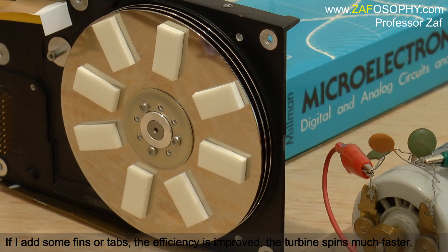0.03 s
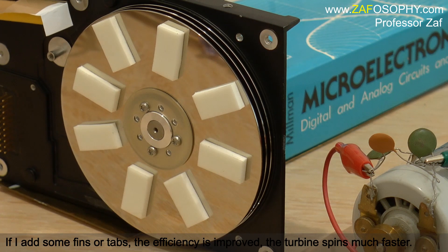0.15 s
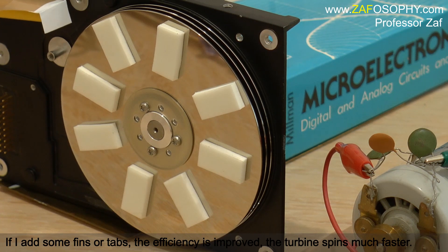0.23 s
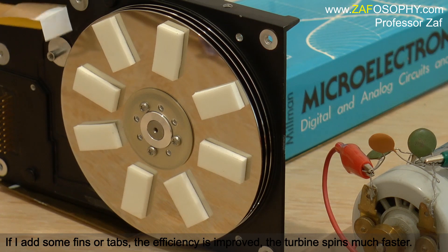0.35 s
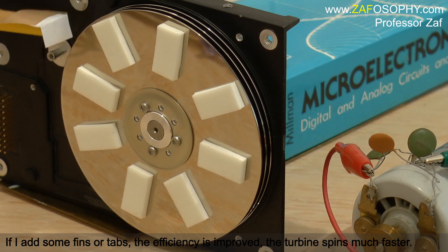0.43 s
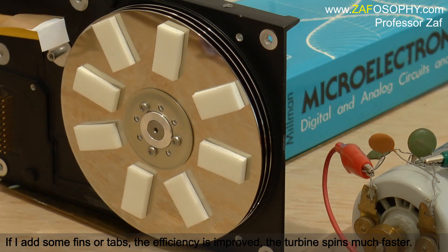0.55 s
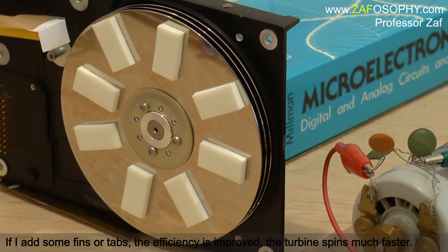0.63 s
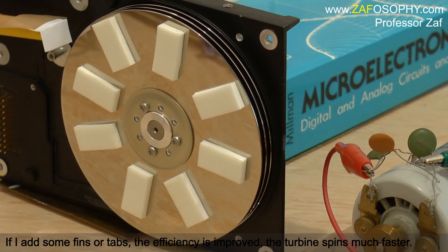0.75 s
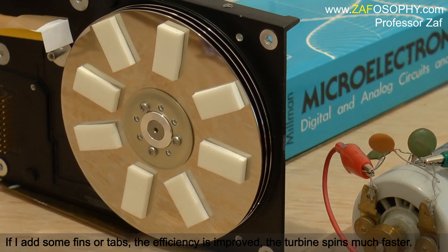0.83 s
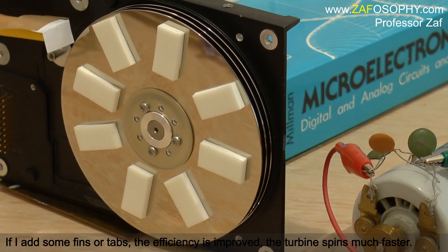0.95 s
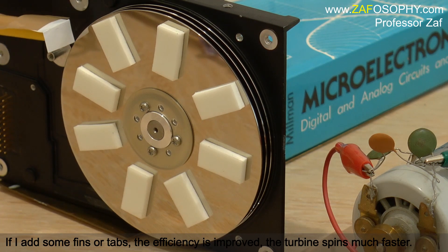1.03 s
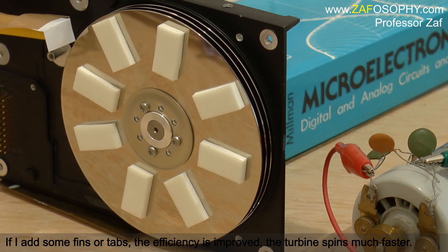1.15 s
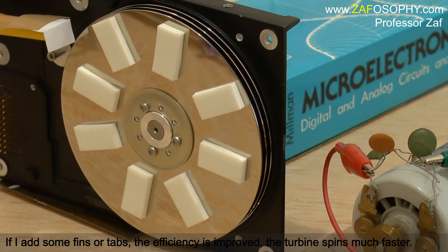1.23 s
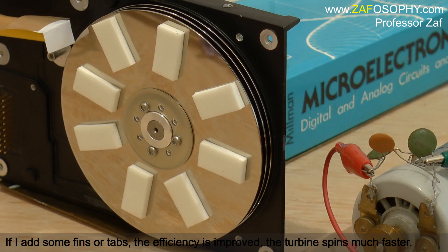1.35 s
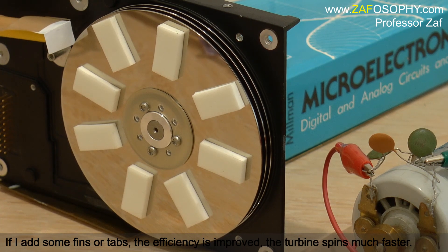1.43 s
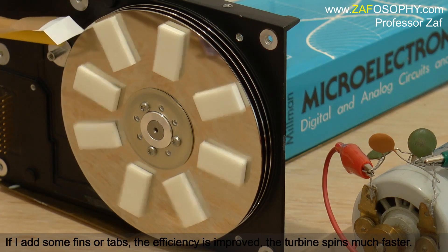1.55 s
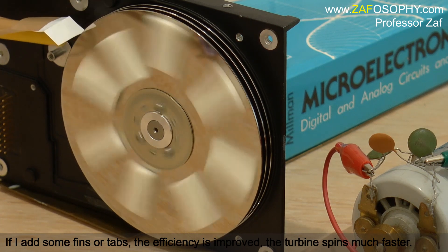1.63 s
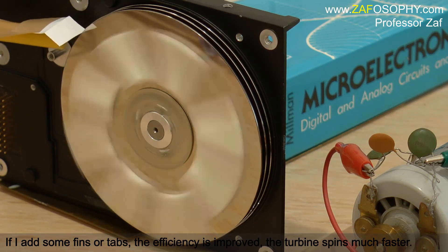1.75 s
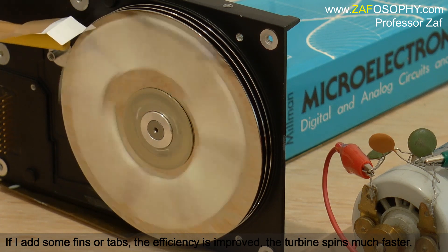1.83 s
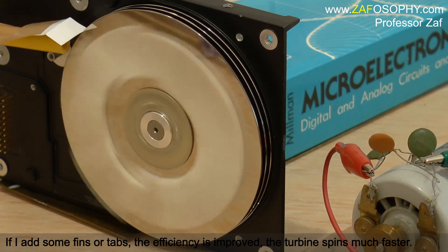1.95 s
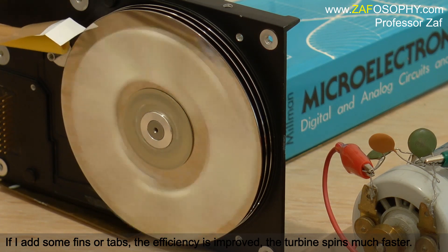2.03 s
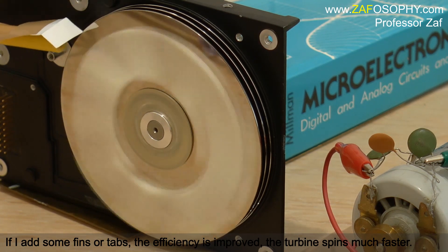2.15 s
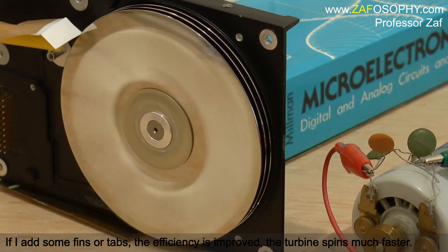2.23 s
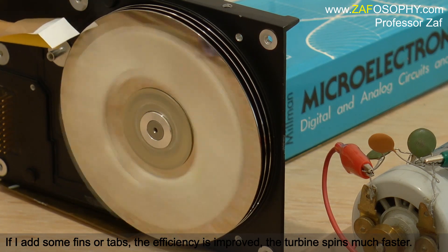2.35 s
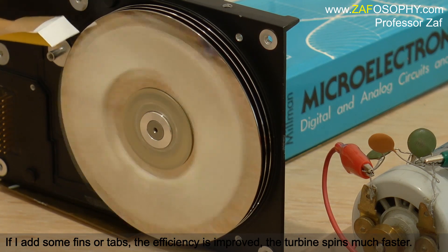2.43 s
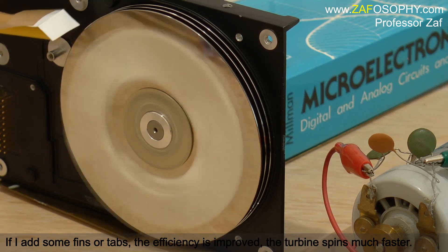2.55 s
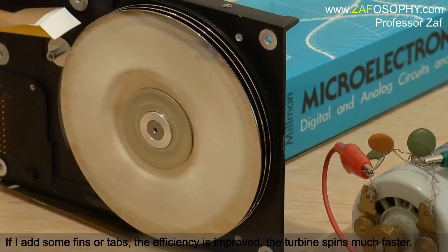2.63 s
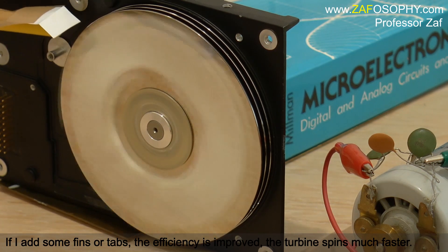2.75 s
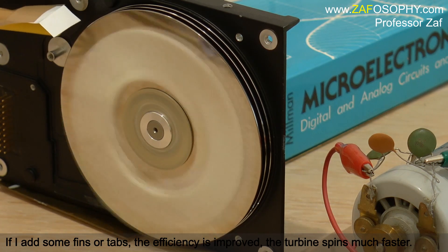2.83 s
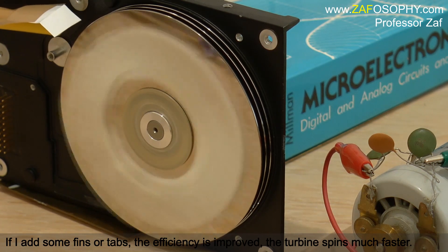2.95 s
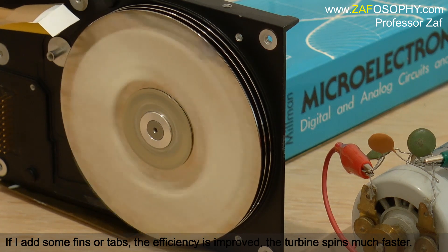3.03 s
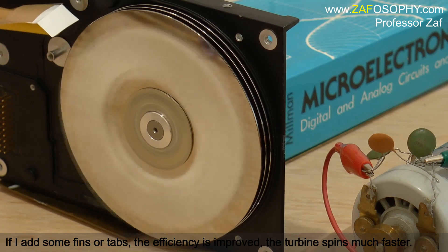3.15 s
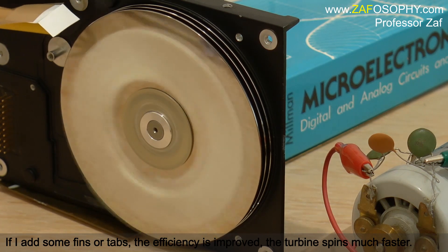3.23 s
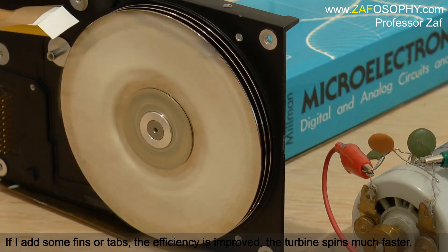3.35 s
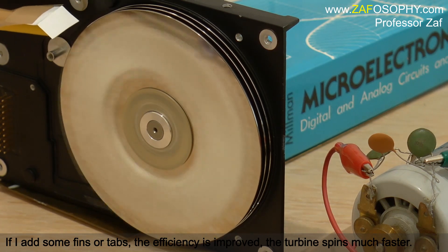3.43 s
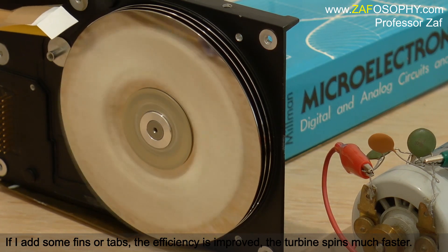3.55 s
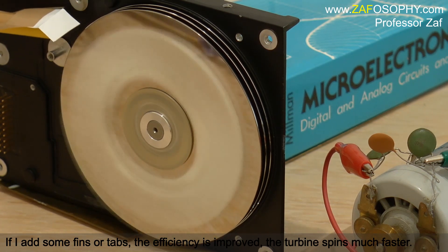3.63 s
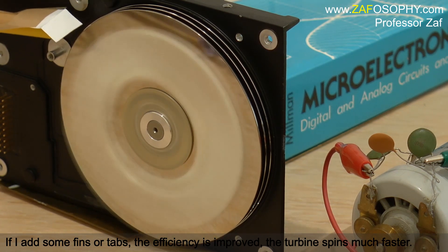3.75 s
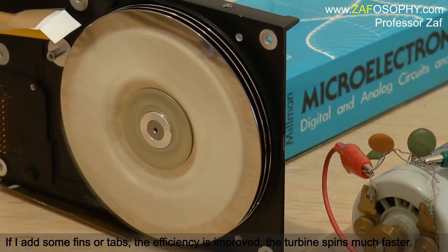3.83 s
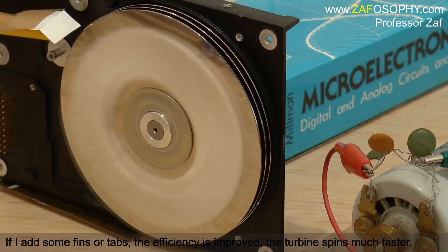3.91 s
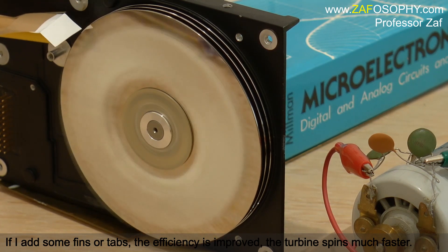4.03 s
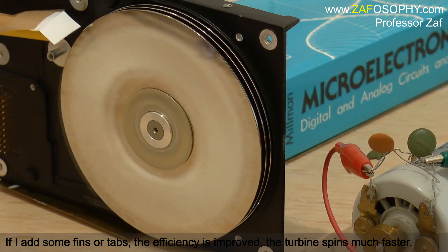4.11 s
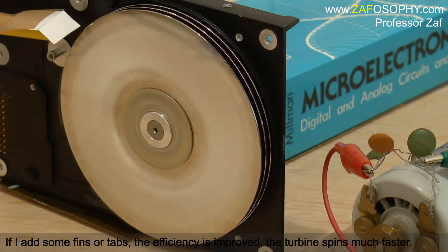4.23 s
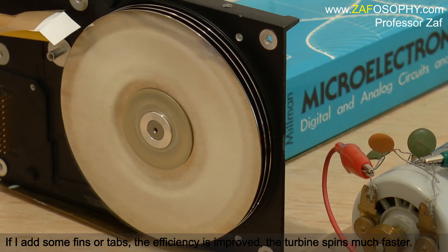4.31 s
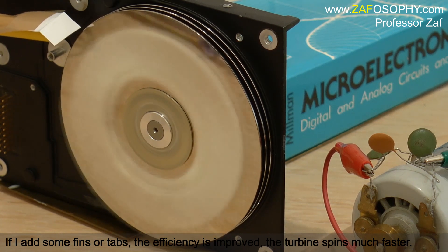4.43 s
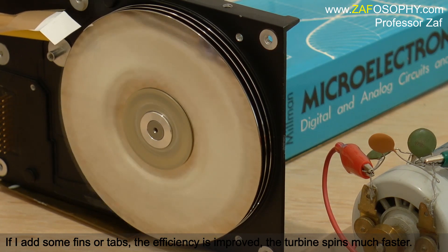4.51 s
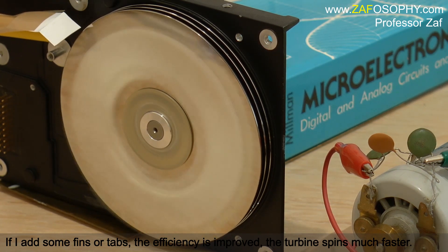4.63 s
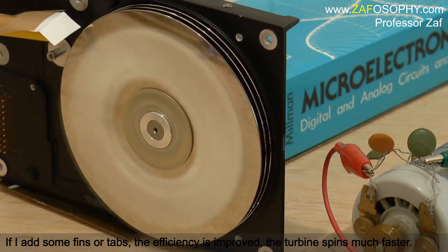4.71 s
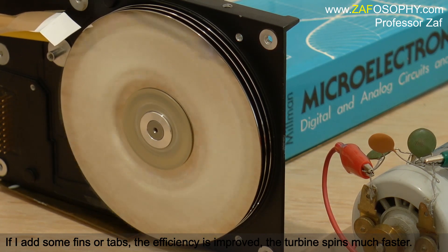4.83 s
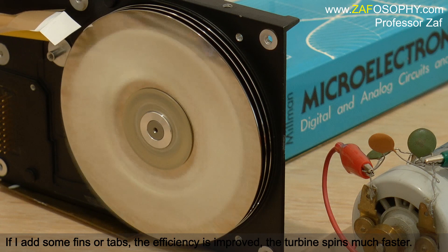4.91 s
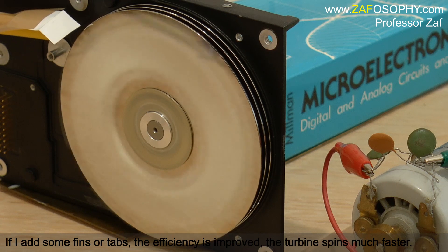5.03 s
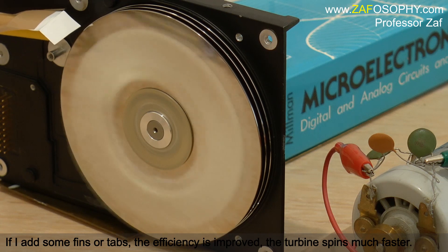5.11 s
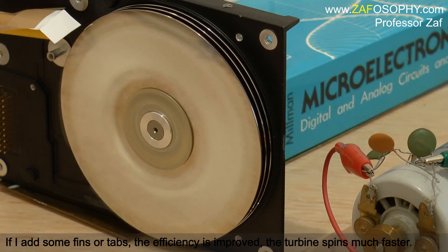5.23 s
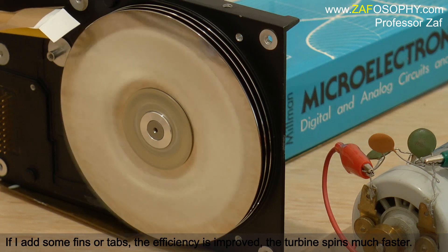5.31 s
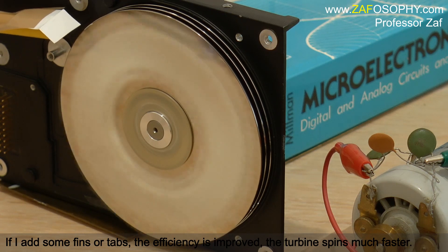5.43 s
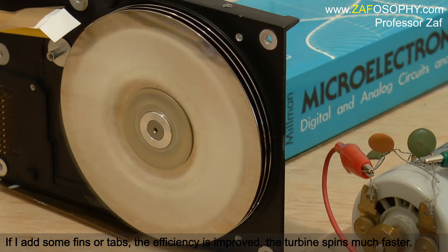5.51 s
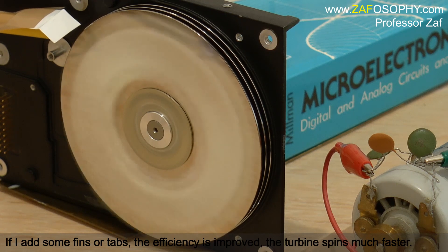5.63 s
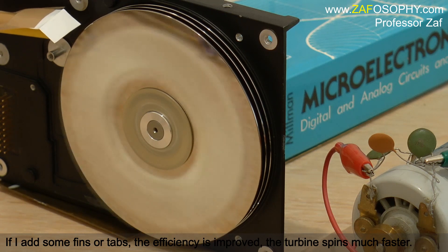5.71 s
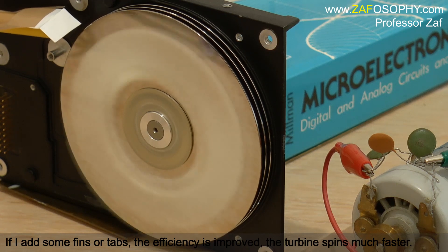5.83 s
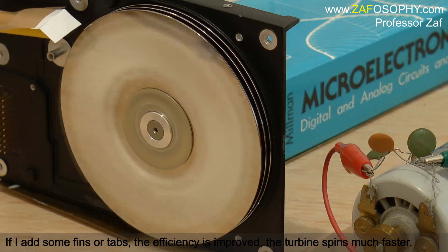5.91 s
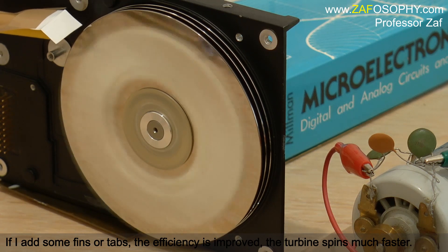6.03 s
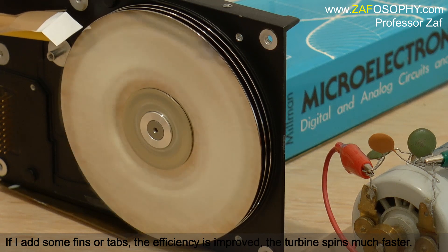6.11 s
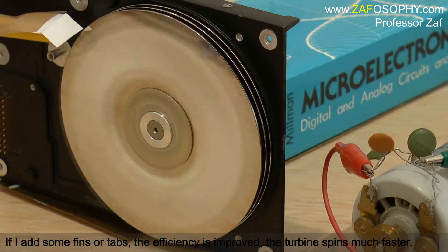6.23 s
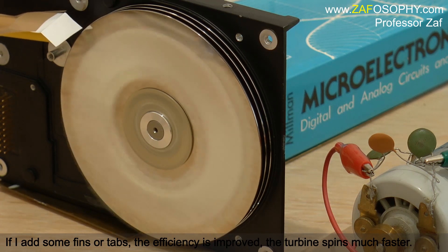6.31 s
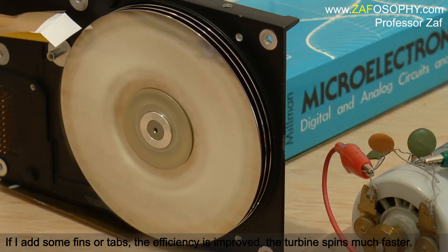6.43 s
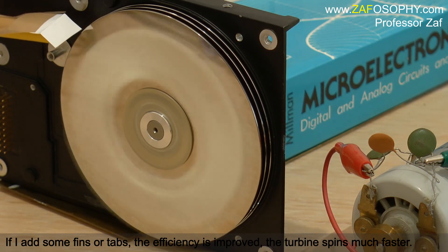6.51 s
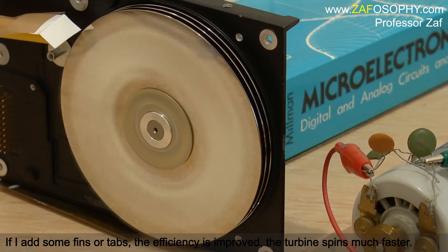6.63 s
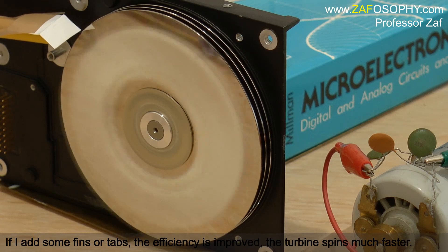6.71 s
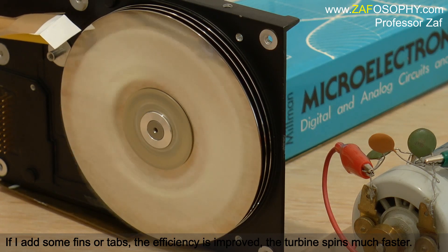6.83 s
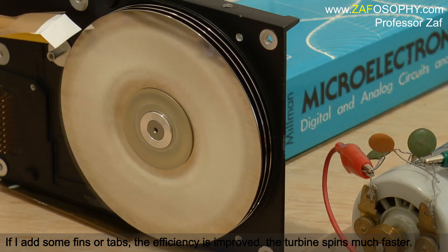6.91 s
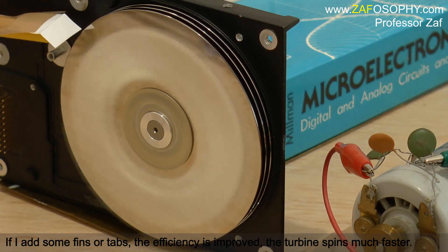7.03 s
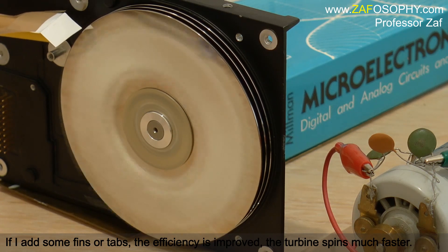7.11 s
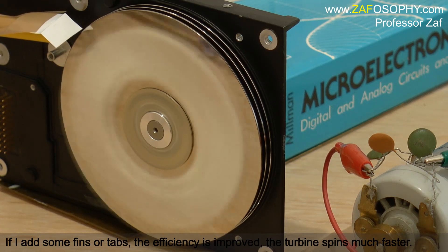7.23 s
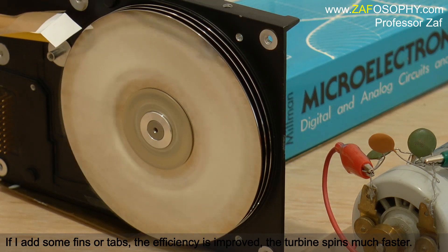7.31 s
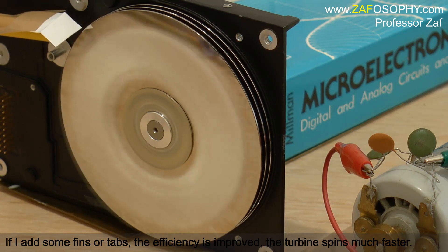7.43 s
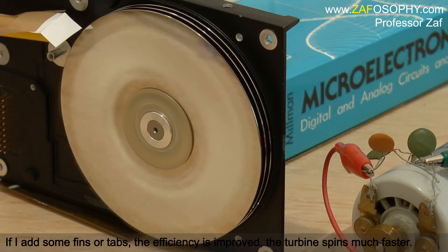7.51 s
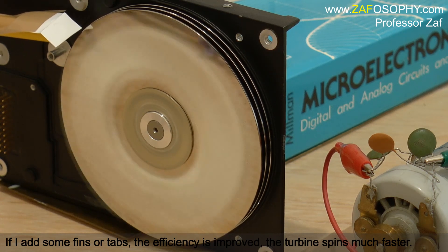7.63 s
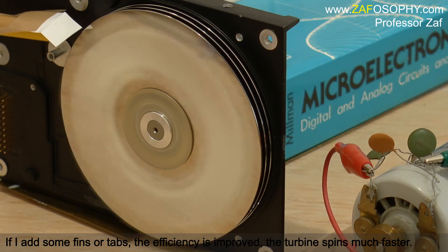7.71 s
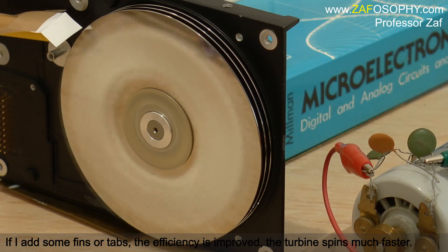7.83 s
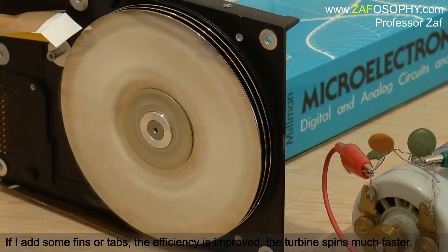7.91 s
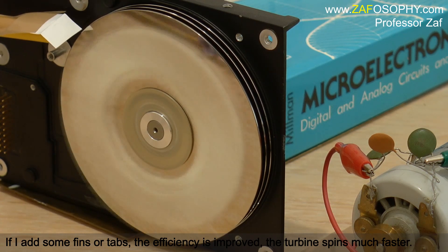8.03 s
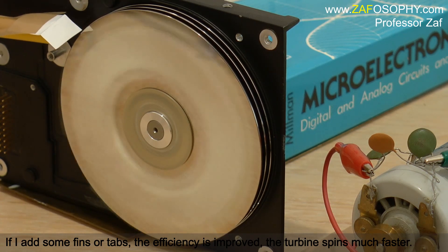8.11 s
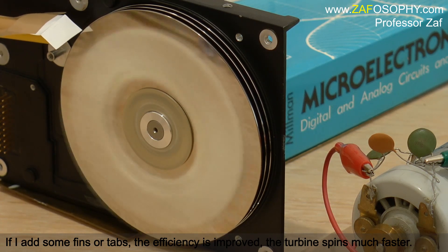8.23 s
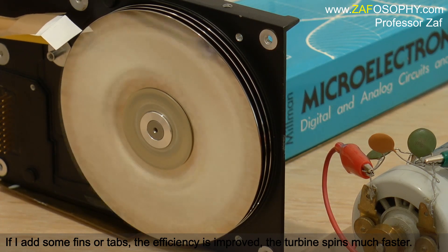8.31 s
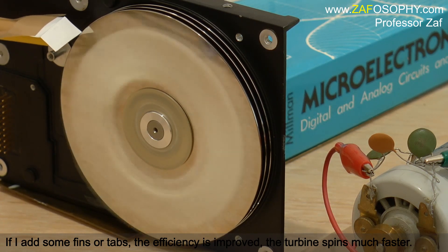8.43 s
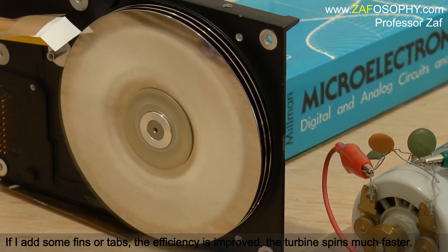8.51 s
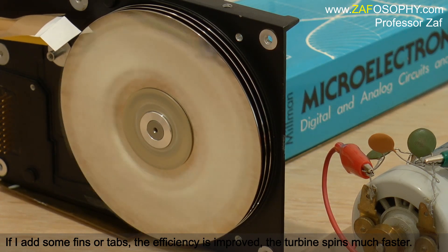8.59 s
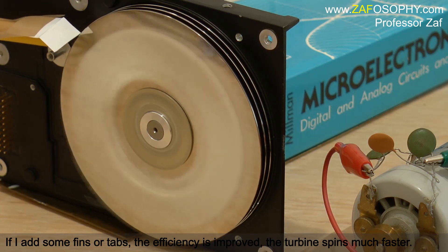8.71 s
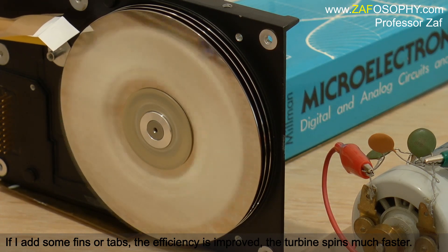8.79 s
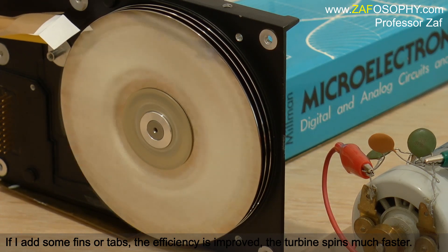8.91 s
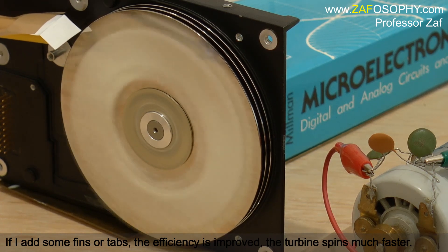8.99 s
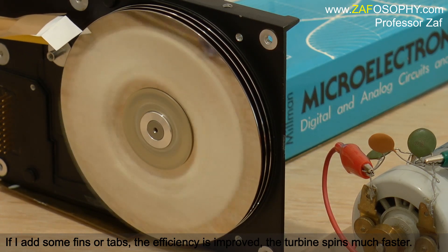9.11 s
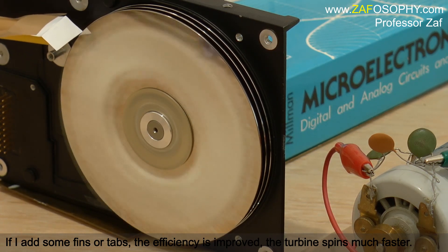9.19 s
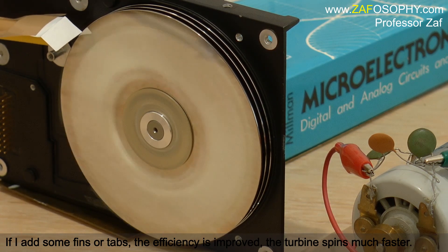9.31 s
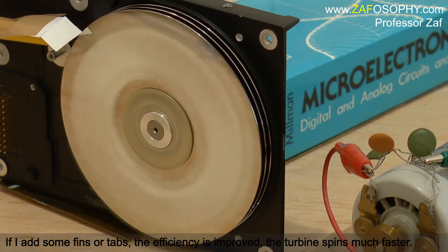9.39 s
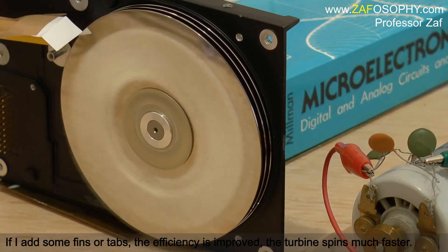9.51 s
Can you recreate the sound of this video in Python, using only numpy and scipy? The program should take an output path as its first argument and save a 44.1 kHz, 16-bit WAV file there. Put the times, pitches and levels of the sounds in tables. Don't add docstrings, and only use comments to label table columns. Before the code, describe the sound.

A close stereo microphone hears a quiet desk scene: soft electrical hum, tiny motor whirr and two light skin scuffs on a nozzle. Suddenly a valve opens and compressed air hisses loudly without a break. The jet drives a finned disc; its hum glides upward beneath the hiss, swelling at case resonances, then drops slightly. Stray air rushes, flutters and thumps softly against the microphone as the aim shifts.

```python
import sys
import numpy as np
from scipy import signal
from scipy.fft import rfft, irfft
from scipy.io import wavfile
from scipy.ndimage import uniform_filter1d

SR = 44100
rng = np.random.default_rng(int(sys.argv[2]) if len(sys.argv) > 2 else 0)


def volts_from_db(level):
    exponent = np.asarray(level, float) / 20
    return 10 ** exponent


def unload_audio(sound):
    columns = np.transpose(np.atleast_2d(sound))
    steps = np.round(np.clip(columns, -1, 1) * 32767)
    wavfile.write(sys.argv[1], SR, steps.astype(np.int16))


N = 421596
T = np.arange(N) / SR
HZ = np.fft.rfftfreq(N, 1 / SR)
VALVE_S = 1.613
SINCE = np.maximum(T - VALVE_S, 0)
STEP = 8

# (frequency [Hz], level per Hz [dB])
JET_COLOUR = [(1400, -19.5), (1700, -14.5), (2100, -15.5), (2500, -9), (3000, -7), (3860, -3.5),
              (6000, -3.5), (7130, 0), (9420, -5.5), (10300, -4), (11800, -9.5), (13300, -13), (15700, -15),
              (16000, -15)]
# (frequency [Hz], side minus middle [dB])
JET_WIDTH = [(1000, -40), (2000, -16), (2600, -47), (7400, -56), (7900, -16.5), (10500, -8.5),
             (12200, -17.5), (13800, -4.5), (16000, -6)]
# (time [s], level [dB])
AIM = [(3.0, -0.5), (3.8, 1), (4.6, 1.5), (5.0, -1), (5.5, 0), (6.2, -3), (6.6, 3), (7.1, 3.5), (7.8, -0.5),
       (8.55, 3.5), (8.95, 4), (9.3, -1), (9.56, 2)]
# (time [s], level over the hiss [dB], half length [s])
RASPS = [
    (2.78, -9, .03),
    (3.83, -8.5, 0.027),
    (4.24, -15, .03),
    (5.76, -13, .025),
]
HISS_DB, LOW_DB, BRIGHT_DB, TOP_DB = -26.5, -12.5, -0.93, -5
LOW_PER_AIM = 0.36
BRIGHT_SAG_DB_PER_S, TOP_SAG_DB_PER_S2 = 0.29, 0.11
BRIGHT_SURGE_DB, BRIGHT_SURGE_S = 2.5, 0.1


def jet(turn):
    chop_db = 0.2 * np.cos(2 * np.pi * 8 * turn)
    eddies = rng.standard_normal(N) * volts_from_db(walk(900) + chop_db)
    lag = np.arange(SR // 5) / SR
    echoes = volts_from_db(-37) * rng.standard_normal(len(lag)) * np.exp(-lag / 0.035)
    echoes[0] = 1
    both = wide(JET_COLOUR, JET_WIDTH, unit(signal.fftconvolve(eddies, echoes)[:N]))

    low = np.hypot(volts_from_db(LOW_DB + LOW_PER_AIM * curve(AIM)), bumps(RASPS))
    surge_db = BRIGHT_SURGE_DB * np.exp(-SINCE / BRIGHT_SURGE_S)
    bright = volts_from_db(BRIGHT_DB - BRIGHT_SAG_DB_PER_S * SINCE + surge_db)
    top = volts_from_db(TOP_DB - TOP_SAG_DB_PER_S2 * SINCE ** 2)
    edges = [1, ramp(2830, 3630), ramp(8000, 8420), ramp(10500, 11900), 0]
    hiss = 0
    for k, gain in enumerate([low, 1, bright, top]):
        band = unit(irfft(both * (edges[k] - edges[k + 1]), N))
        hiss = hiss + band * gain * volts_from_db(HISS_DB + 0.22 * walk(14))

    from_opening = np.abs(T - VALVE_S)
    squeal = volts_from_db(-28) * narrow_noise(10200, 500) * np.exp(-from_opening / 0.03)
    spit = volts_from_db(-50) * narrow_noise(1400, 500) * np.exp(-from_opening / 0.014)
    return hiss + squeal + spit


def valve(rise_s=0.0027, surge_db=2.5, surge_s=0.026):
    opening = np.exp(np.minimum(T - VALVE_S, 0) / rise_s)
    return opening * volts_from_db(surge_db * np.exp(-SINCE / surge_s))


# (multiple of the turn rate, level [dB])
FINS = [(7, -9), (8, 7), (9, 1), (12, 8), (13, 9), (14, 8), (15, 4), (16, 11), (17, 13), (18, 3), (19, -4),
        (20, 13), (21, 14), (22, 7), (23, 9), (24, 2), (25, 4), (26, 1), (27, -6), (28, 3), (29, 8),
        (30, 5), (31, 4), (33, -5), (34, -4), (35, -6), (36, 2), (37, -3), (38, -1), (39, -4), (40, -6),
        (41, -7), (43, -8), (44, -1), (45, -4), (46, -2)]
# (multiple of the turn rate, level [dB])
WOBBLE = [(6, -11.5), (10, -11), (11, -11), (32, -2)]
# (frequency [Hz], width [Hz], level [dB])
CASE = [(138, 12, 13), (192, 10, 11), (219, 16, 1), (249, 9, 7), (269, 9, 2), (305, 18, 5), (351, 18, -5),
        (390, 12, -7), (415, 26, -4), (447, 12, -1), (440, 9, 2), (459, 11, -4), (484, 9, -12),
        (529, 28, -6), (582, 11, -2), (616, 11, -12), (711, 59, -10), (777, 28, -4), (823, 14, -2),
        (871, 60, -15), (997, 15, -2), (1067, 45, -6), (1137, 9, -6), (1226, 60, -6), (1428, 40, 3)]
FULL_SPEED_HZ = 31
HUM_DB, HUM_DB_PER_DECADE = -58, 65
RATTLE_ORDER, RATTLE_DB_PER_S, RATTLE_EVEN_S = 27, 1.5, 7.3


def turbine(speed, turn):
    push_db = HUM_DB + HUM_DB_PER_DECADE * np.log10(speed / FULL_SPEED_HZ) + curve(AIM)
    speed, turn = speed[::STEP], turn[::STEP]
    hz = np.arange(1600.0)
    case = sum(volts_from_db(2 * db) / (1 + (2 * (hz - f) / width) ** 2) ** 1.3 for f, width, db in CASE)
    hum = 0
    for k, db in FINS + WOBBLE:
        power = np.interp(k * speed, hz, case)
        upper_db = 0.12 * max(k - 18, 0) ** 0.9
        gain = np.sqrt(2 * power) * volts_from_db(db + 1 + upper_db + 1.2 * walk(5, STEP))
        if k >= RATTLE_ORDER:
            gain = gain * volts_from_db(RATTLE_DB_PER_S * (T[::STEP] - RATTLE_EVEN_S))
        phase = 2 * np.pi * (k * turn + rng.random())
        lead = 0.23 * rng.standard_normal()
        hum = hum + gain * np.sin([phase + lead, phase - lead])
    return volts_from_db(push_db) * signal.resample_poly(hum, STEP, 1, axis=1)[:, :N]


# (frequency [Hz], level per Hz [dB])
RUSH_COLOUR = [(200, -21), (400, -4.5), (600, 2), (800, 2), (900, -5), (1100, -6), (1430, -3.5), (1750, 0),
               (2300, -27)]
# (frequency [Hz], level per Hz [dB])
CHURN_COLOUR = [(90, -14), (160, -7), (200, -1.5), (300, -1), (450, 0), (600, -9.5), (900, -14)]
# (frequency [Hz], side minus middle [dB])
RUSH_WIDTH = [(100, -12), (250, -10), (600, -12), (1200, -24), (2300, -12)]
# (time [s], level [dB], half length [s])
GUSTS = [(1.94, -44.5, .035), (2.77, -44, 0.089), (2.93, -48, .03), (3.07, -47.5, 0.069), (3.81, -44, .04),
         (3.95, -45, 0.044), (4.08, -46, 0.027), (4.42, -53, 0.072), (4.92, -53, .06), (6.1, -45.5, 0.065),
         (6.24, -40.5, 0.077), (8.12, -53, 0.048), (9.25, -47.5, .05), (9.39, -42, .04)]
RUSH_DB, RUSH_RISE_DB_PER_S, CHURN_DB, CHURN_GUST_DB = -53, 1.0, -55, -9


def case_air():
    gust = bumps(GUSTS)
    rush = unit(irfft(wide(RUSH_COLOUR, RUSH_WIDTH), N)) * volts_from_db(walk(19))
    rush = rush * np.hypot(volts_from_db(RUSH_DB + RUSH_RISE_DB_PER_S * SINCE), gust)
    churn = unit(irfft(wide(CHURN_COLOUR, RUSH_WIDTH), N)) * volts_from_db(walk(13))
    return rush + churn * np.hypot(volts_from_db(CHURN_DB), volts_from_db(CHURN_GUST_DB) * gust)


# (time [s], level [dB], half length [s])
PUFFS = [(2.1, -54, .04), (2.38, -55, 0.046), (2.95, -63, .25), (3.77, -48, .025), (4.01, -51, 0.048),
         (4.34, -58, .025), (6.91, -62, .025), (7.12, -54, 0.033), (7.29, -54, .03), (8.12, -49, 0.029),
         (8.29, -49, 0.045), (8.4, -53, 0.082), (8.6, -58, .3), (9.02, -57, 0.067), (9.32, -55, 0.027),
         (9.5, -59, .03)]
BUFFET_DB, BUFFET_FADE_DB_PER_S = -48, 9
CARRIED_S, CARRIED_DB, LEAK_DB_PER_S = 2.6, -67, 0.77


def buffeting():
    gusts = rng.standard_normal((2, N)) * volts_from_db([3 * walk(25), 3 * walk(25)])
    thump = shape([(8, -4), (30, -7.5), (90, -6), (200, -7), (500, -23.5)])
    buffet = unit(irfft(rfft(gusts) * thump, N))
    spent = volts_from_db(BUFFET_DB - BUFFET_FADE_DB_PER_S * SINCE) * np.clip((CARRIED_S - T) / 0.15, 0, 1)
    leak = volts_from_db(CARRIED_DB + LEAK_DB_PER_S * SINCE)
    return buffet * np.hypot(leak, spent + bumps(PUFFS))


# (multiple of its turn rate, level [dB])
MOTOR = [(5, -77.5), (6, -84), (10, -77), (11, -88), (12, -95), (13, -97), (14, -102), (15, -93.5),
         (16, -96), (17, -94), (19, -94), (20, -93), (23, -113), (25, -89), (26, -85.5), (28, -95),
         (29, -95), (30, -92), (31, -88), (32, -94), (34, -95), (35, -99), (37, -90)]
MOTOR_HZ = 69.38
# (frequency [Hz], level [dB])
MAINS = [(100, -86.5), (200, -81), (300, -82), (3295, -91)]


def motor():
    out = np.zeros(N)
    for k, db in MOTOR + [(hz / MOTOR_HZ, db) for hz, db in MAINS]:
        waver_db = np.repeat(walk(11.2, STEP), STEP)[:N]
        out += volts_from_db(db + 2 + waver_db) * np.sin(2 * np.pi * (k * MOTOR_HZ * T + rng.random()))
    return out + volts_from_db(-81 + 1.8 * walk(25)) * narrow_noise(2815, 35)


# (time [s], level [dB], length [s])
FINGERS = [
    (1.255, -69, .05),
    (1.428, -65, .05),
]


def fingers():
    colour = shape([(120, -4), (280, 0), (600, -10), (2800, -14), (5000, -22)])
    scuff = unit(irfft(rfft(rng.standard_normal(N)) * colour, N))
    return sum(volts_from_db(db) * scuff * (T > s) * np.exp(-np.abs(T - s) / length) for s, db, length in FINGERS)


# (frequency [Hz], level per Hz [dB])
ROOM_COLOUR = [(25, -18), (190, -8), (400, -9.5), (560, -13.5), (750, -17), (900, -29), (1400, -21),
               (1800, -20), (2700, -21), (3300, -22), (3700, -24.5), (6000, -31), (9000, -30), (15800, -31)]
# (frequency [Hz], side minus middle [dB])
ROOM_WIDTH = [(60, 1), (110, -3), (200, -1), (380, -0.5), (700, 0), (1290, -9), (2380, -9), (4400, -17),
              (8120, -5), (15000, -1)]
ROOM_DB = -66.5


def room():
    tone = volts_from_db(ROOM_DB - 1.5) * unit(irfft(wide(ROOM_COLOUR, ROOM_WIDTH), N))
    return (tone + motor() + fingers()) * volts_from_db([[-0.6], [0.6]])


def curve(table):
    s, value = np.transpose(table)
    return np.interp(T, s, value)


def bumps(events):
    return sum(volts_from_db(db) * np.exp(-((T - s) / half) ** 2) for s, db, half in events)


def shape(points):
    hz, db = np.transpose(points)
    return volts_from_db(np.interp(np.log(HZ + 1), np.log(hz), db, left=db[0] - 19, right=db[-1] - 36))


def ramp(lo_hz, hi_hz):
    return np.clip((HZ - lo_hz) / (hi_hz - lo_hz), 0, 1)


def unit(x):
    return x / np.sqrt(np.mean(x ** 2))


def walk(rate, step=1):
    k, n = int(SR / rate / step), len(T[::step])
    held = np.repeat(rng.standard_normal(n // k + 1), k)
    return unit(uniform_filter1d(uniform_filter1d(held, k), k)[:n])


def narrow_noise(hz, half_width_hz):
    return unit(irfft(rfft(rng.standard_normal(N)) / (1 + ((HZ - hz) / half_width_hz) ** 2), N))


# (frequency [Hz], width [Hz], level [dB])
NOTCHES = [(493, 39, -11.5), (658, 63, -8.5), (890, 39, -8), (1290, 33, -14), (1540, 40, -9),
           (1574, 33, -11)]


def wide(colour, width, source=None):
    mid = rfft(rng.standard_normal(N) if source is None else source)
    side = rfft(rng.standard_normal(N)) * shape(width)
    notch_db = sum(db / (1 + (2 * (HZ - hz) / w) ** 2) for hz, w, db in NOTCHES)
    return shape(colour) * volts_from_db(notch_db) * np.array([mid + side, mid - side])


# (time [s], turns per second [Hz])
SPIN = [(1.62, 1.5), (2.0, 7.5), (2.3, 11.8), (2.68, 16.1), (2.99, 18.9), (3.23, 20.8), (3.49, 22.7),
        (3.86, 25.1), (4.38, 27.5), (4.93, 29.4), (5.51, 30.6), (5.84, 30.9), (6.12, 31.0), (7.12, 30.78),
        (7.98, 29.8), (8.43, 29.1), (9.17, 27.7), (9.56, 26.8)]


def scene():
    speed = curve(SPIN)
    turn = np.cumsum(speed) / SR
    return valve() * (jet(turn) + turbine(speed, turn) + case_air() + buffeting()) + room()


def band_limit(x):
    return signal.sosfilt(signal.butter(12, 15970, fs=SR, output="sos"), x)


# (frequency [Hz], left minus right [dB])
LEAN = [(1, 0), (7000, 0), (8500, .5), (22050, .5)]


def record(dry):
    lean = np.sqrt(shape(LEAN))
    top_cut = (1 - ramp(15690, 15830)) ** 2
    mix = irfft(rfft(dry) * [lean, 1 / lean] * top_cut, N)
    return band_limit(mix)


dry = scene()
out = record(dry)
unload_audio(out)
```